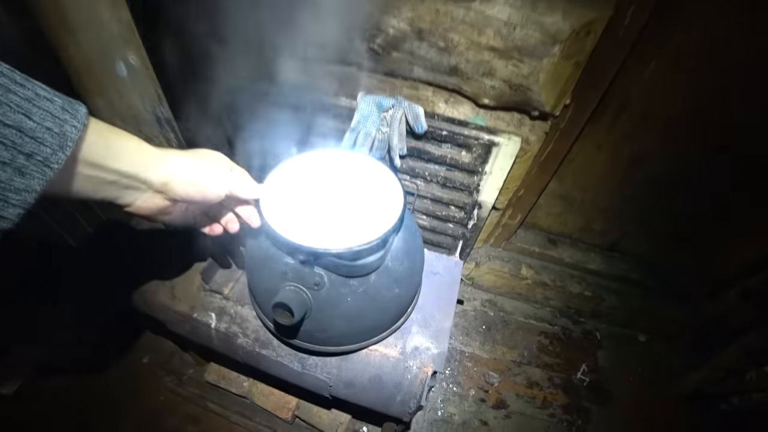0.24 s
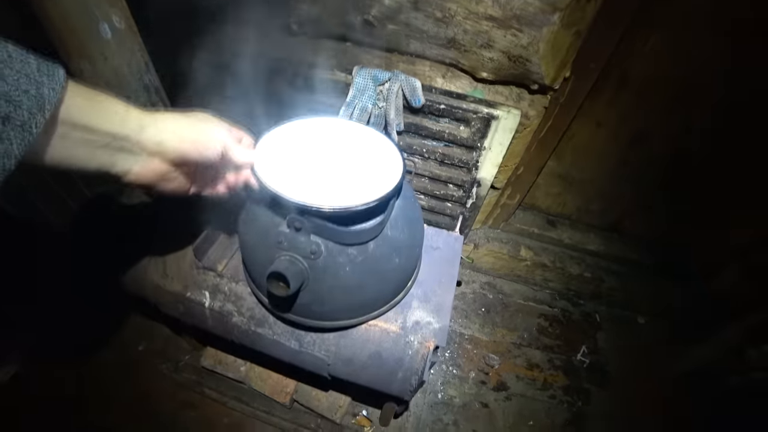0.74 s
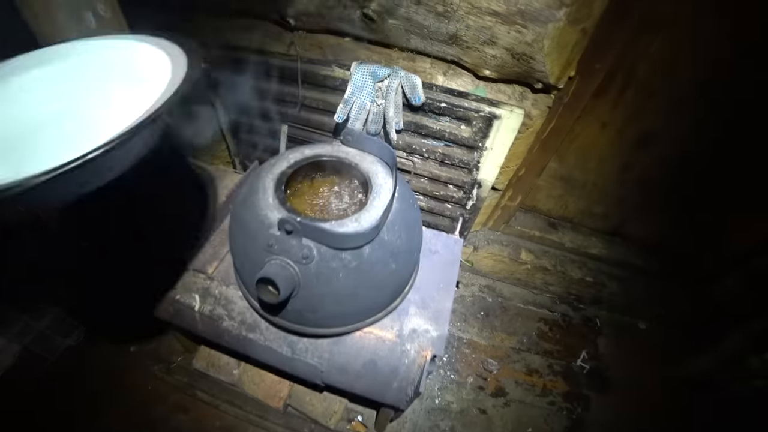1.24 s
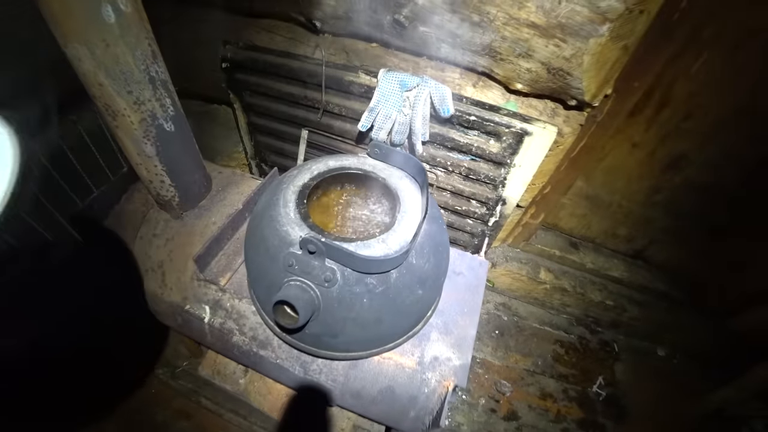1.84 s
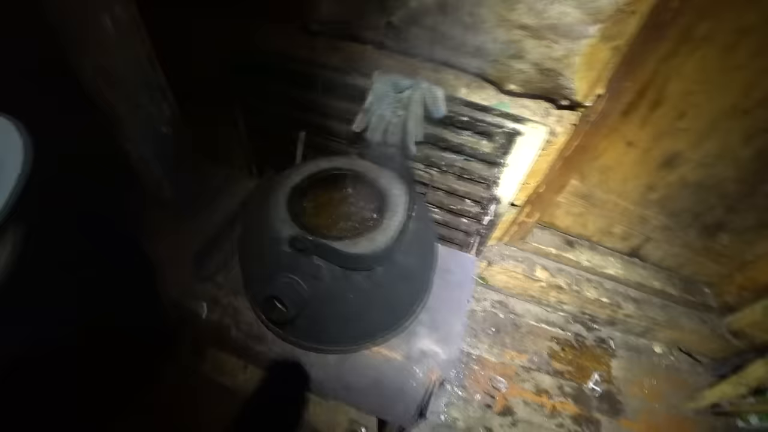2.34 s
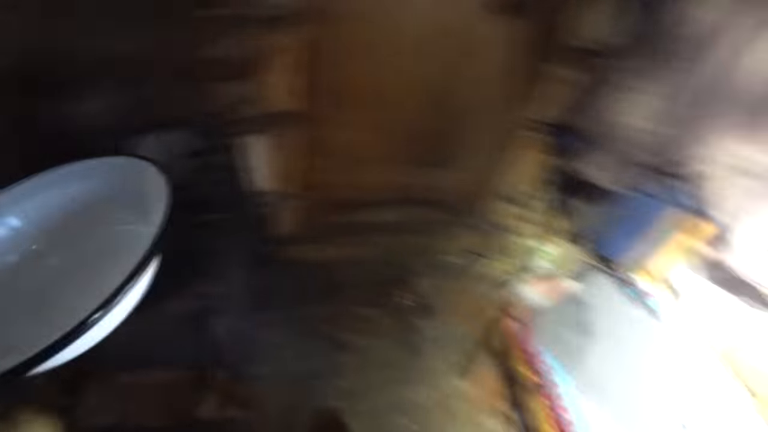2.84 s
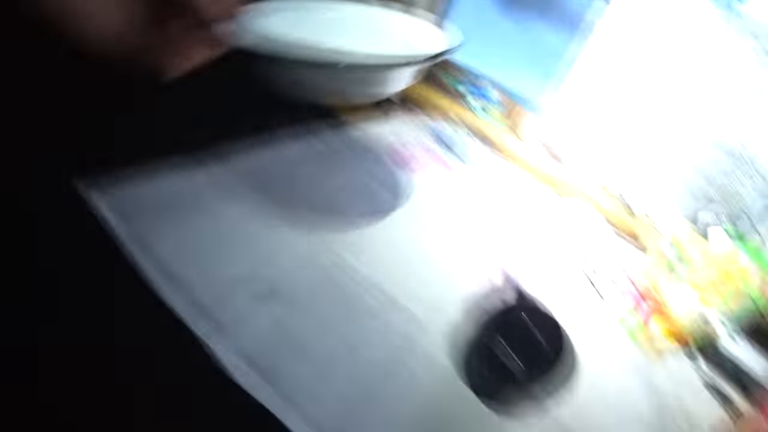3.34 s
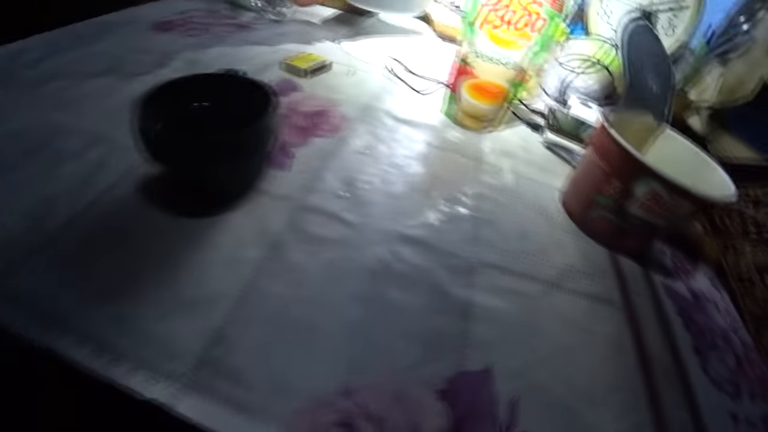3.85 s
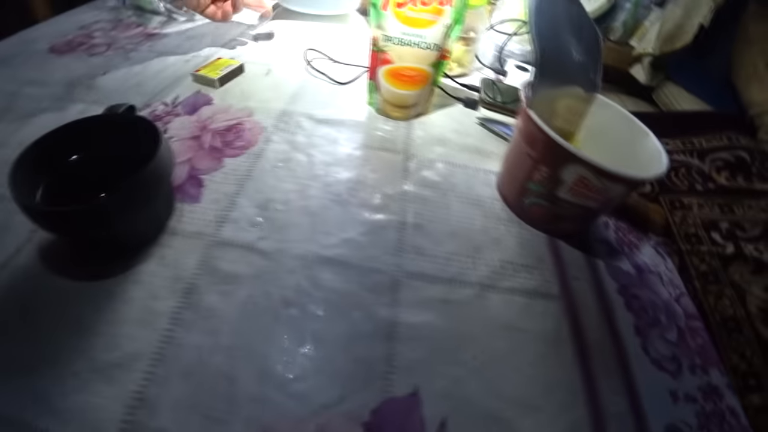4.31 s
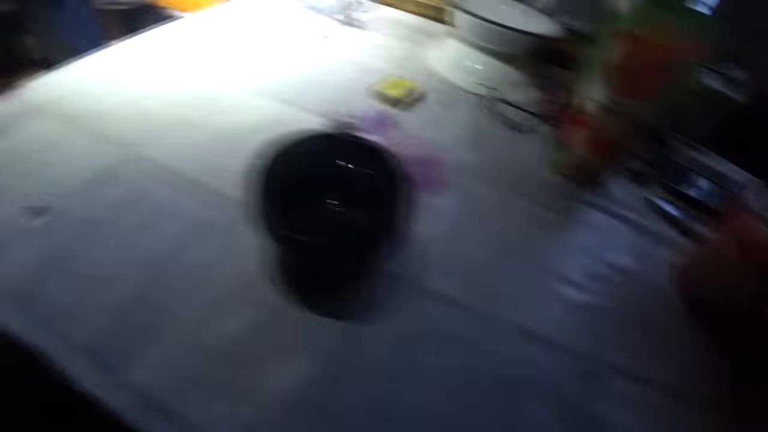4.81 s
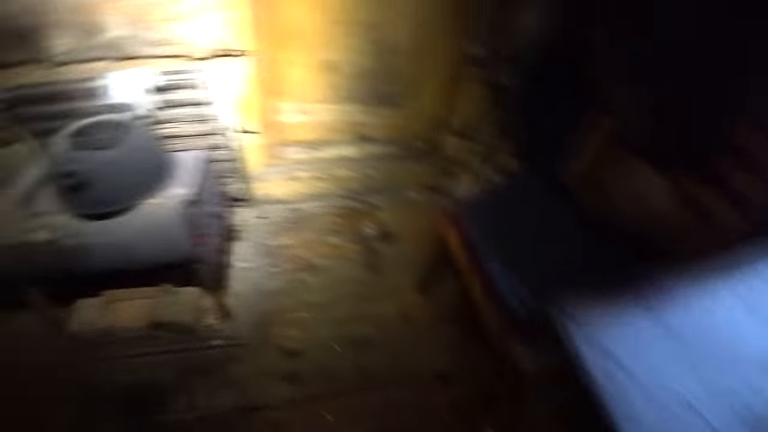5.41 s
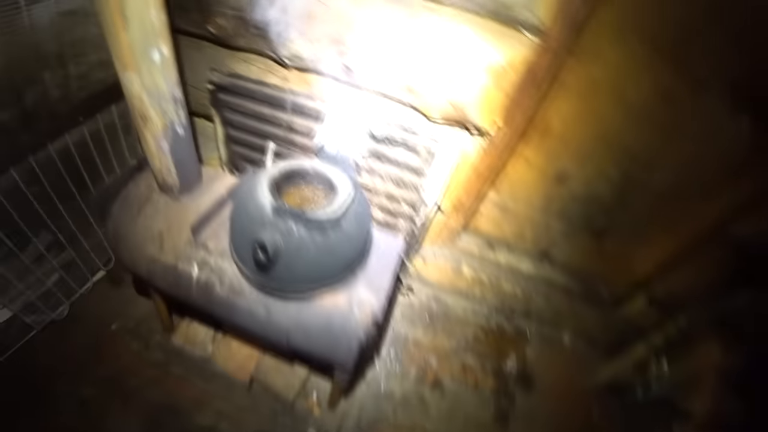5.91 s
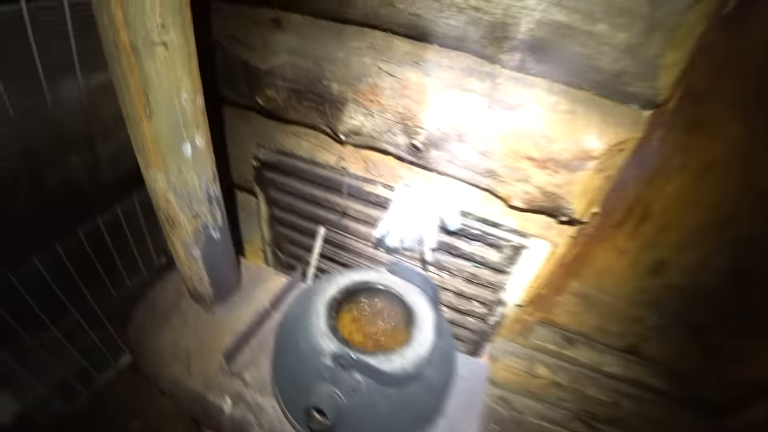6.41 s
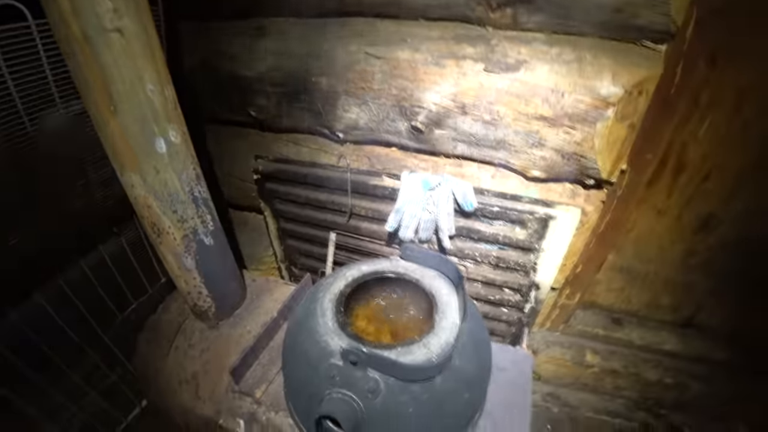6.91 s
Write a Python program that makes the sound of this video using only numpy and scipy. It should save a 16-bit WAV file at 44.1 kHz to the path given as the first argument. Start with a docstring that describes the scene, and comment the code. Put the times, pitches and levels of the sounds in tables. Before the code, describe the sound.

A small log cabin with a short, dry echo and a handheld microphone near a wood stove. A kettle gives a steady, grainy, fizzing hiss with watery simmer beneath, over faint low draught; a tick snaps at the start. From about 0.4 to 1.0 s an enamel bowl slides off its mouth, bumping the rim softly near 0.7 s, and the hiss opens up, brighter and hollower. After 2.5 s it falls away as the microphone turns, with a low wind-like buffet around 3 s, a floor thump at 3.3 s and light rubbing. At 4.03 s the bowl strikes a wooden table: a very loud, sharp metallic clank, then small rattling knocks until 4.3 s. A rustle at 4.7 s, a footfall and ticks around 5.2-5.3 s lead back; the sizzle swells by 5.8 s and stays close to the end at about 7 s, with a thump at 6.2 s and a tick at 6.6 s.

```python
"""A small log cabin: a kettle sizzles on a wood stove, as noise and bubble impulses through fixed spectra.
An enamel bowl is lifted off its mouth and carried over floorboards to a table, where it lands with a loud
clank and rocks to rest: struck decaying modes plus noise bursts. The hiss fades and returns as the
microphone moves away and back; the stove rumbles, the fire ticks and clothes rustle."""
import sys
import numpy as np
from scipy import signal
from scipy.fft import rfft, irfft, next_fast_len
from scipy.io import wavfile
from scipy.ndimage import uniform_filter1d, map_coordinates

SR = 44100
rng = np.random.default_rng(int(sys.argv[2]) if len(sys.argv) > 2 else 0)


def log_audio(samples):
    """Write samples as a 16-bit WAV file to the path given in sys.argv[1]."""
    # one column per channel
    frames = np.atleast_2d(samples).T
    # limit to full scale, then quantise
    limited = np.clip(frames, -1, 1)
    pcm = np.round(limited * 32767).astype(np.int16)
    wavfile.write(sys.argv[1], SR, pcm)


N = 315756
TIME = np.arange(N) / SR  # s, whole scene
AGE = np.arange(SR * 3 // 5) / SR  # s, one short event


def amp(db):
    """Decibels to gain."""
    return 10 ** (np.asarray(db) / 20)


def unit(x):
    """Scale to rms 1."""
    return x / np.sqrt(np.mean(x ** 2) + 1e-20)


def along(points, hz):
    """Interpolate (f/Hz, value) points on a log frequency axis."""
    f, v = np.transpose(points)
    return np.interp(np.log(hz + 1), np.log(f + 1), v)


def wobble(rate_hz):
    """Smooth random curve through rate_hz knots a second."""
    knots = rng.standard_normal(int(N * rate_hz / SR) + 4)
    return map_coordinates(knots, [TIME * rate_hz])


def filtered(x, response):
    """Multiply the spectrum of x by a response of frequency."""
    n = x.shape[-1]
    m = next_fast_len(n + SR // 4)
    spectrum = rfft(x, m) * response(np.fft.rfftfreq(m, 1 / SR))
    return irfft(spectrum, m)[..., :n]


def shape(points):
    """Response through (f/Hz, level/dB) points."""
    return lambda f: amp(along(points, f))


def resonances(rows):
    """Sum of (f/Hz, width/Hz, level/dB) resonances of alternating sign."""
    def response(f):
        total = 0
        for k, (centre, width, db) in enumerate(rows):
            band = 1j * f * width / (centre * centre - f * f + 1j * f * width)
            total = total + (-1) ** k * amp(db) * band
        return total
    return response


def stereo(pair, response, alike=None):
    """Colour two unrelated signals and mix them as mid and side to a set left-right correlation, rms 1."""
    # Default likeness: f/Hz, left-right correlation
    wide = [(60, 0.97), (380, 0.36), (950, 0.16), (2380, 0.5), (6000, 0.8), (11000, 0.72)]
    likeness = wide if alike is None else alike

    def mid_side(f):
        turn = np.arccos(np.clip(along(likeness, f), -1, 1)) / 2
        return response(f) * np.array([np.cos(turn), np.sin(turn)])

    mid, side = filtered(pair, mid_side)
    return unit(np.array([mid + side, mid - side]))


def noise(response):
    """Coloured stereo noise of rms 1, scene length."""
    return stereo(rng.standard_normal((2, N)), response)


def burst(response):
    """Event-length coloured noise, close to the microphone, rms 1."""
    # Likeness of close sounds: f/Hz, left-right correlation
    close_alike = [(100, 1), (500, 0.91), (1000, 0.75), (2400, 0.21), (6000, 0.69), (11000, 0.82)]
    return stereo(rng.standard_normal((2, len(AGE))), response, close_alike)


def fade(t60_s):
    """Exponential decay, 60 dB in t60_s."""
    return amp(-60 * AGE / max(t60_s, 1e-3))


def ring(modes, scatter_db, spread):
    """Struck (f/Hz, level/dB, t60/s) modes: decaying sines, random in strength, phase and ear offset."""
    total = 0
    ears = np.array([[1], [-1]])
    for hz, db, t60_s in modes:
        strength, start, offset = rng.standard_normal(3)
        phase = 2 * np.pi * hz * AGE + np.pi * start + ears * spread * offset
        total = total + amp(db + scatter_db * strength) * fade(t60_s) * np.sin(phase)
    return total


def add(track, s, sound):
    """Mix a sound into the track at s seconds."""
    start = max(round(s * SR), 0)
    track[:, start:start + sound.shape[-1]] += sound[:, :N - start]


def bubbles(rate_hz, size_db):
    """Random impulses of steam bubbles collapsing on the hot bottom, unequal in size, rms 1."""
    spread = np.minimum(rng.exponential(size=(2, N)), 5)
    sizes = rng.standard_normal((2, N)) * amp(size_db * spread)
    return unit(sizes * (rng.random((2, N)) < rate_hz / SR))


def hollow(x, wet_db, t60_s, count=16):
    """Echoes from kettle and logs ripple the spectrum: overlapping windows, a new random tail in each."""
    wet = np.zeros((2, N))
    hop = N // count
    for start in range(-hop, N, hop):
        window = np.maximum(0, 1 - np.abs(np.arange(N) - start - hop) / hop) ** .5
        part = (x * window)[:, max(start, 0):start + 2 * hop]
        echoes = rng.standard_normal(SR // 10) * fade(t60_s)[:SR // 10]
        echoes = echoes[None] / np.linalg.norm(echoes)
        add(wet, start / SR, signal.fftconvolve(part, echoes, axes=1))
    return unit(x + amp(wet_db) * wet)


LIFT_START_S, LIFT_LENGTH_S, LIFT_POWER = 0.37, 0.66, 2.6  # bowl comes off the mouth, slowly at first


def heard(law):
    """Level/dB of one kettle sound: escapes as the mouth is uncovered, falls with distance."""
    # Microphone to kettle: t/s, distance/m
    path = [(0, 0.88), (1.75, 0.68), (2.38, 0.59), (2.6, 0.75), (2.82, 1.84), (3.85, 3.4), (5.1, 2.36),
            (5.8, 0.86), (6.25, 0.63), (7.16, 0.51)]
    level_db, loss_db, covered_db = law
    path_s, path_m = np.transpose(path)
    distance_m = np.interp(TIME, path_s, path_m)
    opening = np.clip((TIME - LIFT_START_S) / LIFT_LENGTH_S, 0, 1) ** LIFT_POWER
    escaping = opening + (1 - opening) * amp(covered_db)
    return level_db + 20 * np.log10(escaping) - loss_db * np.log2(distance_m)


def kettle():
    """Collapsing bubbles sizzle out of the mouth, ring the walls and stir the air above the water."""
    # Bubble spectra, sizzle and simmer: f/Hz, level/dB
    sizzle_bands = [(1500, -24), (3500, -10.5), (4500, -12), (5400, -4), (6300, -2), (7300, -0.5),
                    (8200, -4), (9200, -10), (10300, -7.5), (11200, -13)]
    simmer_bands = [(150, -8), (300, -5), (800, 1), (1150, 2), (1700, 0), (2200, 0.5), (3300, -3.5),
                    (4500, -4), (7000, -12.5), (11000, -27)]
    # Kettle body, then air above the water: f/Hz, width/Hz, level/dB
    wall_modes = [(1070, 123, 1.5), (1290, 83, 1.5), (1426, 36, 1), (2050, 210, -3), (2516, 200, -2.5),
                  (3220, 220, -2)]
    cavity_modes = [(468.7, 28, 0.5), (549, 66, -1), (606, 34, -0.5)]
    # Open kettle: base level at 1 m/dB, loss per doubling of distance/dB, change under the bowl/dB
    sizzle_law = (-41.5, 6.74, -6.5)
    simmer_law = (-45.5, 1.98, -0.58)
    hum_law = (-49.5, 4.6, -21)
    easing_db_per_s = 0.98  # sizzle, once open

    open_s = np.maximum(TIME - LIFT_START_S - LIFT_LENGTH_S, 0)
    sizzle_db = heard(sizzle_law) - easing_db_per_s * open_s
    simmer_db, hum_db = heard(simmer_law), heard(hum_law)
    boil_db = 0.44 * wobble(13)

    fizz = stereo(bubbles(rate_hz=7000, size_db=-0.5), shape(sizzle_bands))
    sizzle = amp(sizzle_db + boil_db) * hollow(fizz, wet_db=-8.0, t60_s=0.061)
    water = stereo(bubbles(rate_hz=4000, size_db=-1.5), shape(simmer_bands))
    simmer = amp(simmer_db + boil_db) * hollow(water, wet_db=-4, t60_s=0.06)

    walls_db = (sizzle_db + simmer_db) / 2 + boil_db - 6.5
    walls = amp(walls_db) * stereo(bubbles(rate_hz=1500, size_db=0.0), resonances(wall_modes))

    modes, band = resonances(cavity_modes), shape([(250, -14), (450, 0), (610, 0), (750, -14)])
    hum = amp(hum_db + 0.13 * wobble(8.2)) * noise(lambda f: modes(f) * band(f))
    # Balance in dB, left stronger
    return sizzle * amp([[.9], [-.9]]) + (simmer + walls) * amp([[.4], [-.4]]) + hum


def air():
    """Stove draught as low noise; the microphone's turn adds lumpy buffets that swell, hold and stop short."""
    # Draught: f/Hz, level/dB
    draught_bands = [(20, -1.5), (60, -1), (90, -1), (130, -2.5), (200, -3.5), (300, -7.5), (600, -10),
                     (2000, -30)]
    swing_s, hold_s, swing_db = 2.89, .19, -34  # turn at full speed: start, length, level
    rise_db_per_s, fall_db_per_s = 58, 320
    early_s = np.maximum(swing_s - TIME, 0)
    late_s = np.maximum(TIME - swing_s - hold_s, 0)
    buffet_db = swing_db - rise_db_per_s * early_s - fall_db_per_s * late_s + 2.3 * wobble(25.05)
    buffet = noise(shape([(10, -14), (25, 4.5), (45, 2), (70, -7.5), (130, -21), (400, -46), (2000, -94)]))
    rumble = amp(-49.0 + 1.05 * wobble(5)) * noise(shape(draught_bands))
    return rumble + amp(buffet_db) * buffet


def ticks():
    """Fire, hot metal and handled things tick: a tiny noise snap and a brief fuzzy resonance."""
    # Ticks: t/s, level/dB, f/Hz, t60/s
    tick_rows = [(0.0635, -36, 6900, 0.03), (2.0, -42, 3000, .05), (2.31, -39, 1220, 0.11),
                 (3.350, -36.5, 6260, 0.016), (3.863, -34.5, 6800, 0.045), (3.864, -41.5, 970, 0.13),
                 (5.178, -35, 2500, 0.0077), (5.3182, -31, 5500, 0.028), (5.739, -38.5, 2310, 0.038),
                 (5.912, -39, 4100, 0.036), (6.601, -34.5, 1240, 0.024)]
    out = np.zeros((2, N))
    for s, db, hz, t60_s in tick_rows:
        snap = burst(shape([(300, -11), (1000, 1), (8000, 8), (12000, -16)])) * fade(0.012)
        body = burst(resonances([(hz, hz * .15, 0)])) * fade(t60_s)
        add(out, s, amp(db) * (body + amp(2.0) * snap))
    return out


def rustles():
    """Sliding bowl, sleeves and soles rub: band noise, grainy in level, in short Gaussian swells."""
    # Rubs: centre t/s, level/dB, half length to 1/e/s, f/Hz, width/share of f
    rub_rows = [(.52, -50.5, 0.22, 196, 0.18), (3.421, -45, 0.11, 1920, 1.1), (3.567, -45.5, 0.18, 694, 1),
                (4.728, -43.5, 0.054, 1010, 1.5), (5.35, -38.5, 0.022, 1050, 0.64),
                (5.626, -48, 0.031, 219, 0.25)]
    out = np.zeros((2, N))
    middle_s = AGE[-1] / 2
    for s, db, half_s, hz, width in rub_rows:
        rub = burst(resonances([(hz, hz * width, 0)]))
        grain = amp(0.83 * wobble(117.0)[:len(AGE)])
        swell = np.exp(-((AGE - middle_s) / half_s) ** 2)
        add(out, s - middle_s, amp(db) * rub * grain * swell)
    return out


def bumps():
    """Thumps push the floor, ring its boards and leave a shudder; the lifted bowl bumps the kettle's rim."""
    # Thumps of feet and jolted table: t/s, push level/dB, push f/Hz, board level/dB
    step_rows = [(.648, -47, 100, -30), (0.703, -33.5, 122, -44), (3.285, -28, 63.5, -26.5),
                 (4.046, -34, 52, -47), (5.179, -25, 68, -29.5), (5.251, -36, 116, -44),
                 (6.157, -28.5, 74, -40), (6.245, -36.5, 77.4, -51)]
    # Floorboards, then kettle rim: f/Hz, level/dB, t60/s
    board_modes = [(140, -1.5, 0.047), (195, -3.5, 0.21), (258, -9, 0.1), (322, -33, .08), (470, -11, .05),
                   (715, -11, 0.036)]
    rim_modes = [(823, -3, 0.079), (650, -14, 0.097), (1260, -6, .03), (1910, -2.5, 0.031)]
    # Floor shudder: f/Hz, level/dB
    joist_bands = [(30, -4), (70, 5.5), (120, 1.5), (250, -11.5), (500, -33), (2000, -70)]
    out = np.zeros((2, N))
    onset = 1 - fade(0.0031)
    for s, push_db, push_hz, board_db in step_rows:
        push = -np.sin(2 * np.pi * push_hz * AGE) * fade(0.17)
        shudder = amp(-6.0) * burst(shape(joist_bands)) * fade(0.41)
        boards = ring(board_modes, scatter_db=1.5, spread=.1)
        add(out, s, (amp(push_db) * (push + shudder) + amp(board_db) * boards) * onset)
    add(out, .698, amp(-27) * ring(rim_modes, scatter_db=3.0, spread=0.2))
    return out


def bowl():
    """Each contact knocks the table, rings the bowl according to where it is hit, and grates the enamel."""
    # Landing and rocking: t/s, knock level/dB, ring level/dB, scratch level/dB, place (0 foot, 1 side)
    blow_rows = [(4.0267, -3.5, 0.5, -10, 0.12), (4.039, -16, -17, -32, 1), (4.049, -19, -22, -39, 0.82),
                 (4.069, -30, -13, -16, 0.22), (4.148, -29, -42, -23, 0.076), (4.157, -22.5, -45, -19, 0.4),
                 (4.1613, -25.5, -33, -15.5, 0), (4.185, -23.5, -38, -36, 0.71),
                 (4.193, -18, -25, -32, 0.77), (4.200, -19.5, -14, -36, 0.96), (4.246, -44, -46, -38, 0.94),
                 (4.296, -25.5, -25.5, -35, 0.76)]
    # Enamel bowl: f/Hz, level struck on foot/dB, level struck on side/dB, t60/s
    bowl_modes = [(1195, -22, -12, .16), (1569, 2, -22, .16), (1615, -14, -16, .32), (1825, -28, -10, .15),
                  (3888, -5, -22, .14), (6025, 2, -27, .115), (2130, -25, -21, .1), (2560, -22, -18, .22),
                  (2736, -14, -28, .14), (3020, -26, -14, .12), (3533, -13, -30, .14),
                  (3660, -18, -24, .19), (4025, -30, -14, .1), (4212, -14, -24, .14), (5015, -20, -21, .1),
                  (5330, -13, -30, .09), (5382, -8, -30, .115), (6680, -13, -26, .14), (7060, -18, -22, .1),
                  (7850, -17, -30, .13), (8325, -11, -30, .11), (8915, -15, -28, .1), (9472, -20, -34, .12),
                  (10235, -16, -32, .09), (10510, -13, -32, .08), (10880, -14, -30, .08)]
    # Bowl seated on its foot, then table top: f/Hz, level/dB, t60/s
    seated_modes = [(540, 0, .1), (1180, 0, .14), (2961, -18, .17), (3887, -21, .11), (5028, -17, .1),
                    (6718, -19, .1)]
    table_modes = [(208, -4, .1), (230, 2, .13), (295, 2.5, .14), (357, -3, .15), (426, -2, .14),
                   (491, -5, .13), (538, -3, .16), (696, -7, .12), (757, -6, .12), (822, 2, .12),
                   (966, -3, .12), (1055, -2, .11), (1322, -3, .1)]
    # Table knock, then enamel grating: f/Hz, level/dB
    knock_bands = [(60, -16), (130, -24), (220, -8), (700, 4), (1300, -2), (1900, -5.5), (2400, -15.5),
                   (4000, -9.5), (6500, -15), (11000, -24)]
    scratch_bands = [(1500, -46), (4500, -11), (5500, 8), (7000, -8), (8400, 11.5), (9500, 0), (10700, 18),
                     (12000, -19)]
    out = np.zeros((2, N))
    onset = 1 - fade(0.0031)
    for s, knock_db, ring_db, scratch_db, place in blow_rows:
        side = np.clip(place, 0, 1)
        modes = [(hz, foot + side * (wall - foot), t60_s) for hz, foot, wall, t60_s in bowl_modes]
        metal = ring(modes, scatter_db=0.6, spread=0.28)
        wood = amp(-5.5) * ring(table_modes, scatter_db=1.5, spread=0.054)
        wood = wood + amp(-2) * fade(0.14) * burst(shape(knock_bands))
        scratch = fade(.05) * burst(shape(scratch_bands))
        blow = amp(ring_db) * metal + amp(knock_db) * wood + amp(scratch_db) * scratch
        add(out, s, blow * onset)
    settled_s = blow_rows[-1][0]
    add(out, settled_s, amp(-22) * ring(seated_modes, scatter_db=5.5, spread=0.3))
    return out


def cabin(x):
    """Log walls answer briefly: convolution with a noise tail whose decay varies with frequency."""
    # Reverberation: f/Hz, t60/s
    cabin_t60 = [(100, 0.3), (1000, 0.19), (4000, 0.26), (11000, 0.27)]
    hz, t, z = signal.stft(burst(np.ones_like), SR, nperseg=256)
    decay = amp(-60 * t / along(cabin_t60, hz)[:, None])
    tail = signal.istft(z * decay, SR, nperseg=256)[1]
    tail = np.pad(tail, ((0, 0), (SR // 250, 0)))  # 4 ms delay
    return signal.fftconvolve(x, tail / np.linalg.norm(tail[0]), axes=1)[:, :N]


def scene():
    """Handling sounds and their echo over the kettle and stove."""
    near = ticks() + bumps() + bowl()
    return kettle() + air() + rustles() + near + amp(-12) * cabin(near)


def record(dry):
    """Dull microphone, 10 ms limiter that lets short peaks through to clip, band limit."""
    mic_hz, top_hz = 11120, 15757
    x = filtered(dry, lambda f: 1 / np.sqrt(1 + np.minimum(f / mic_hz, 2) ** 500))
    level = np.sqrt(np.abs(uniform_filter1d(np.mean(x ** 2, axis=0), size=SR // 100)))
    x = x / np.maximum(1, level / amp(-4.0))
    x = np.clip(x, -1, 1)
    return filtered(x, lambda f: f < top_hz)


dry = scene()
out = record(dry)
log_audio(out)
```